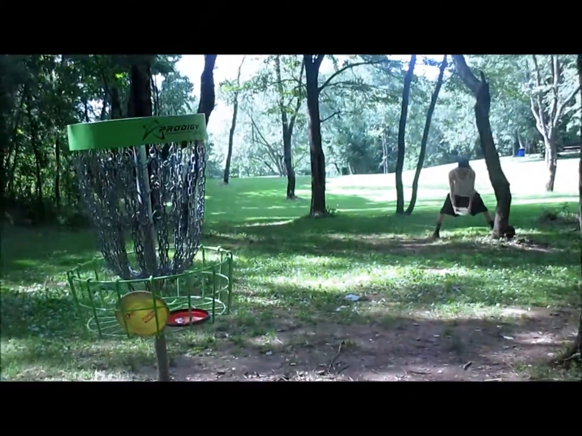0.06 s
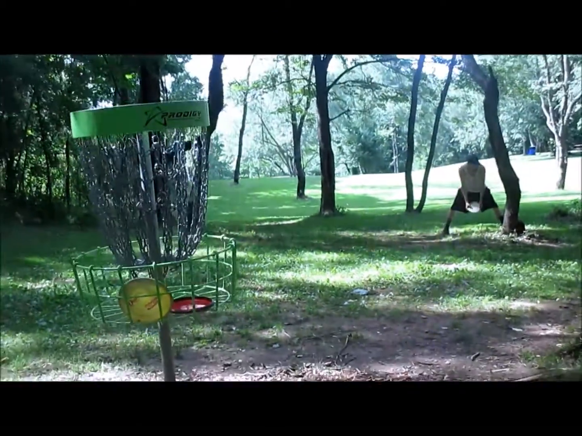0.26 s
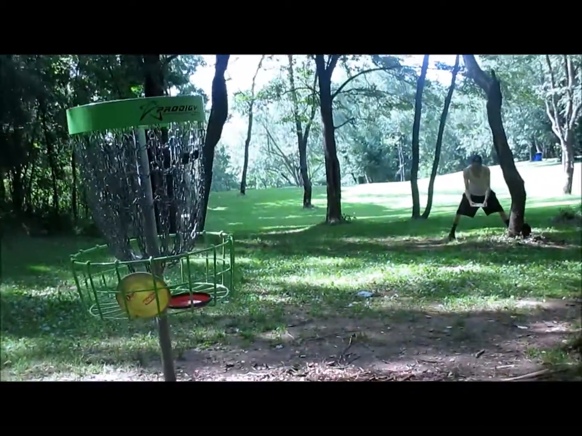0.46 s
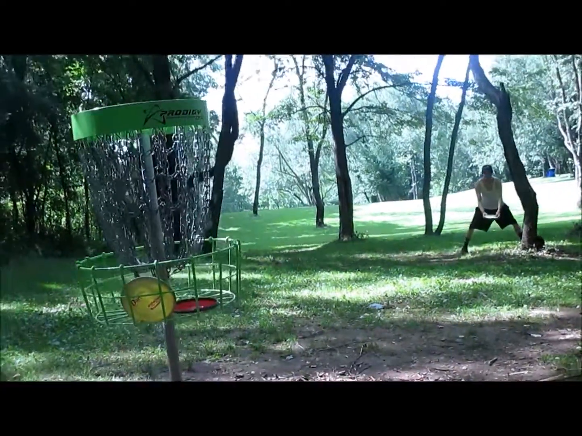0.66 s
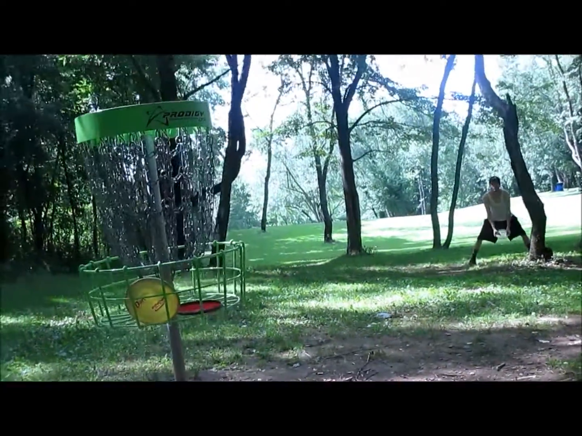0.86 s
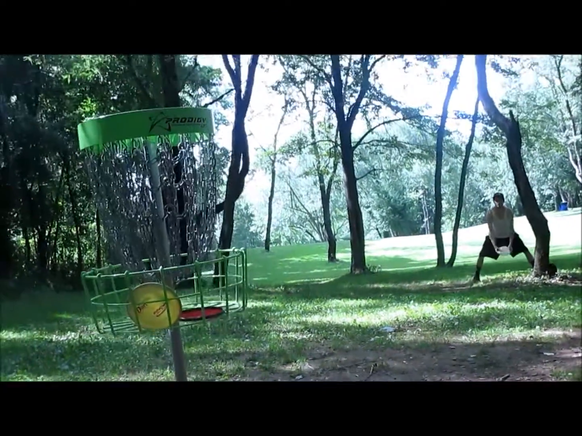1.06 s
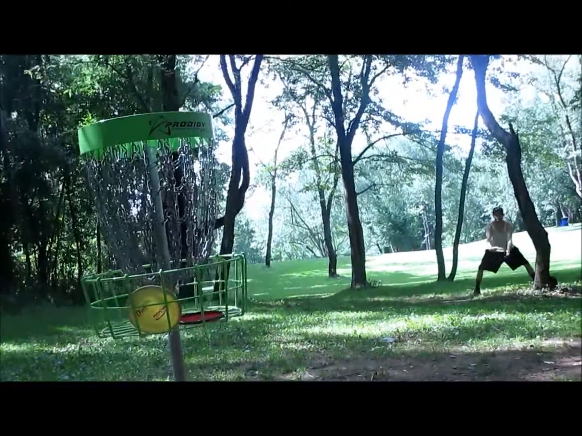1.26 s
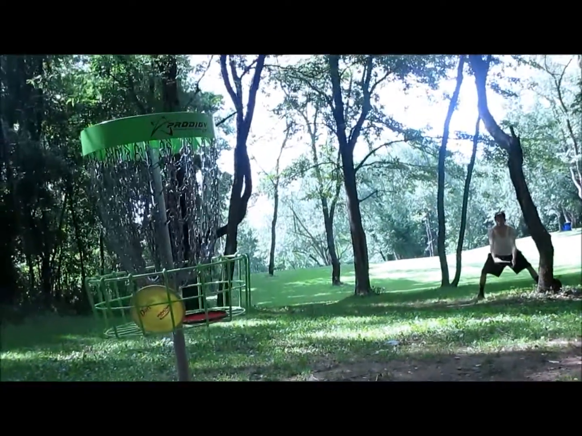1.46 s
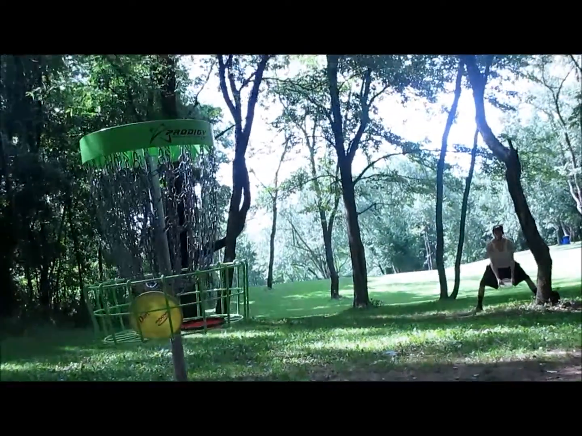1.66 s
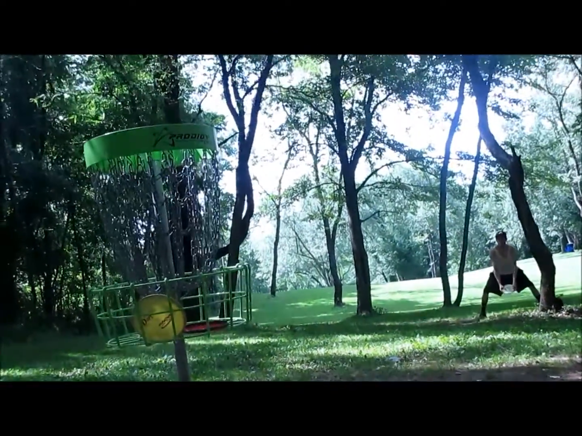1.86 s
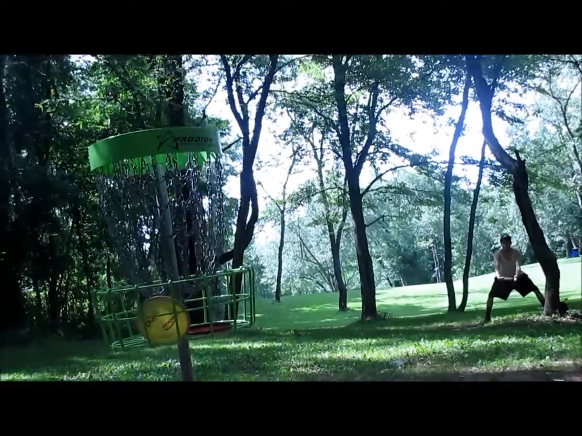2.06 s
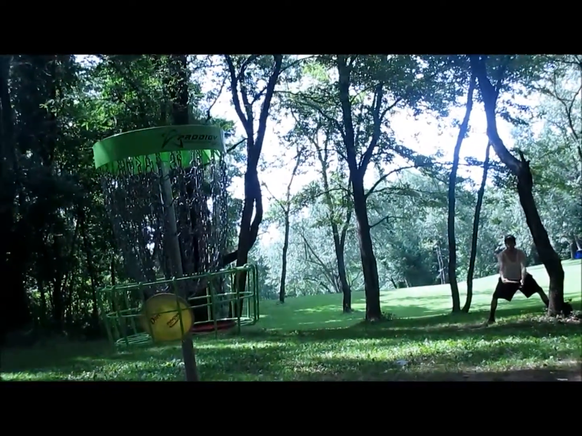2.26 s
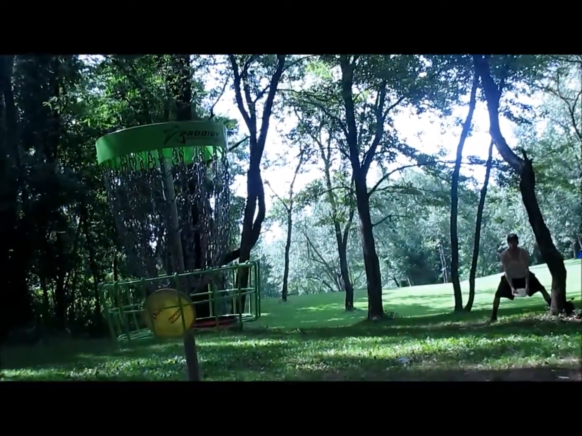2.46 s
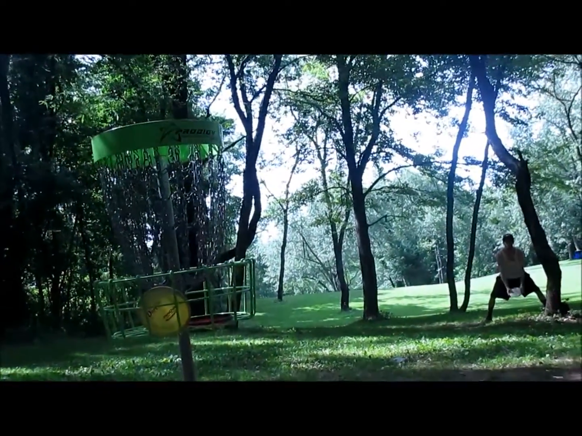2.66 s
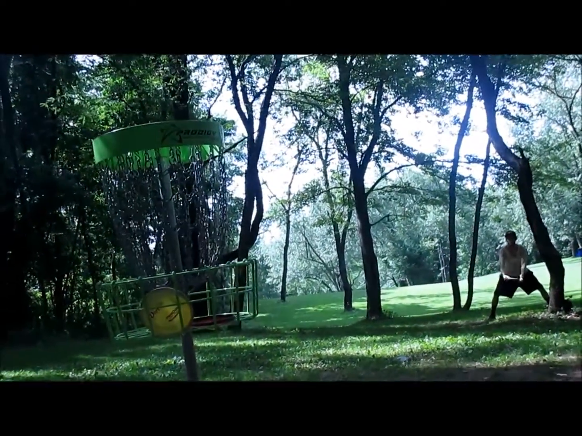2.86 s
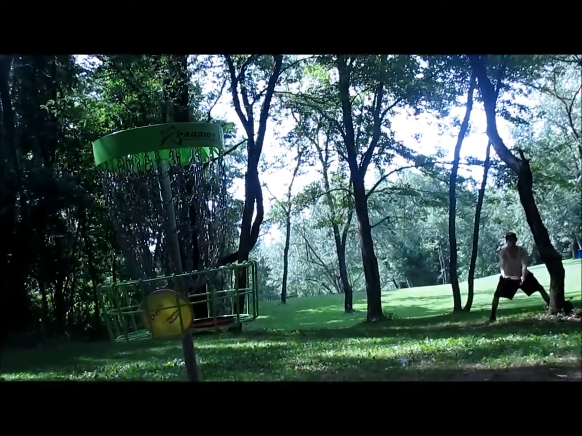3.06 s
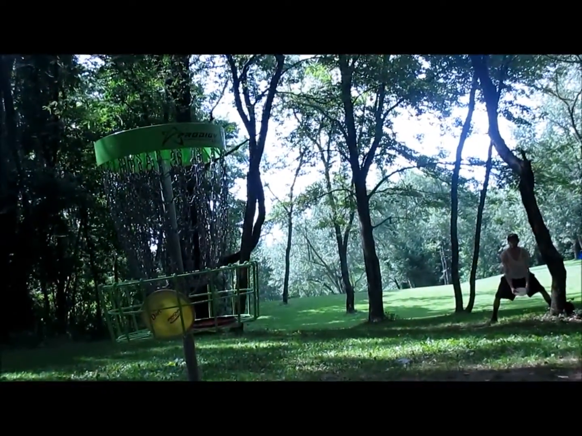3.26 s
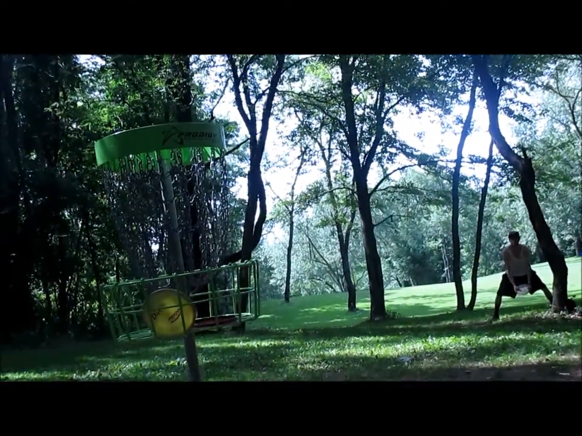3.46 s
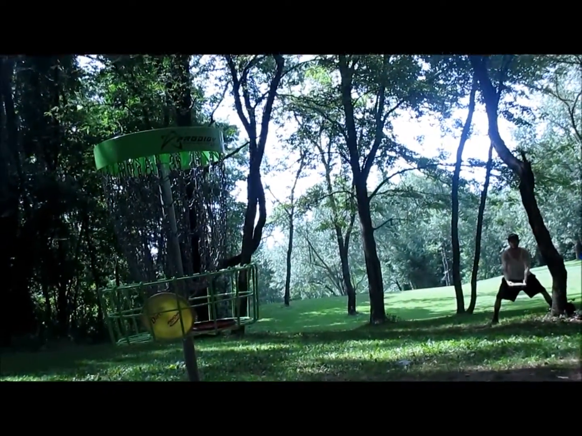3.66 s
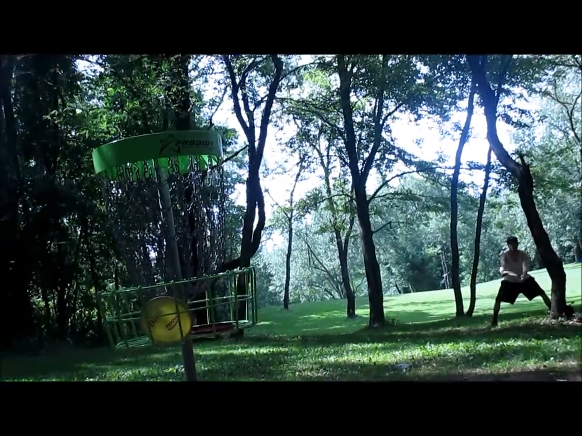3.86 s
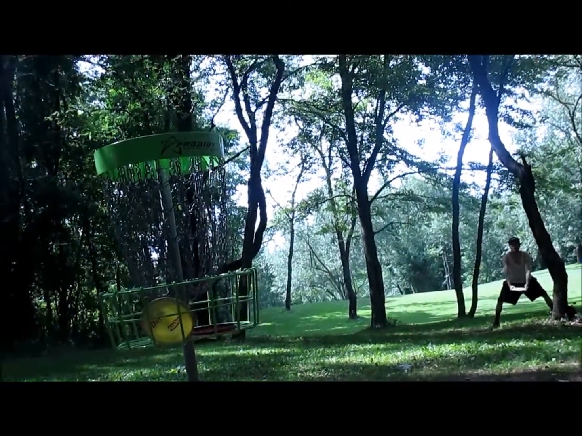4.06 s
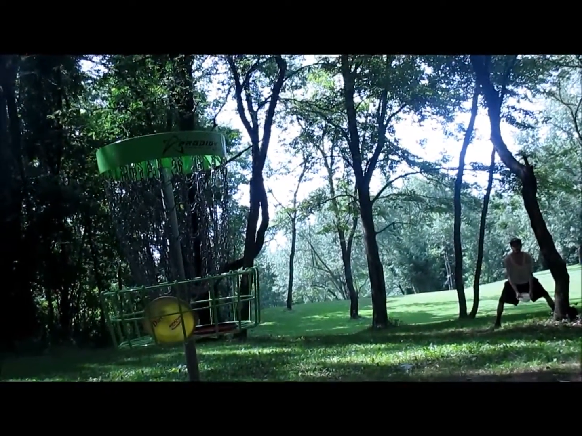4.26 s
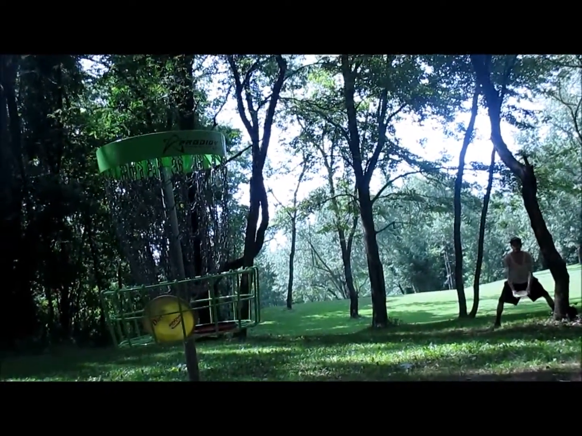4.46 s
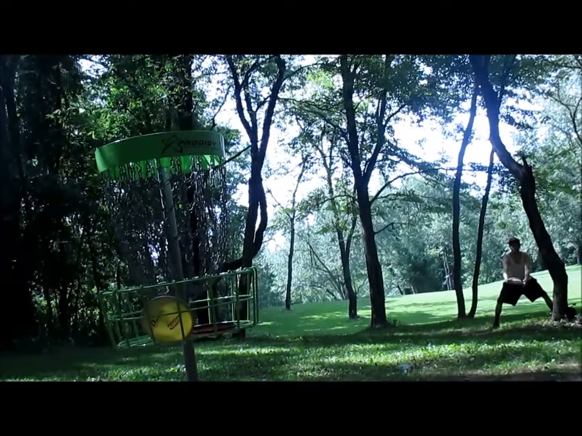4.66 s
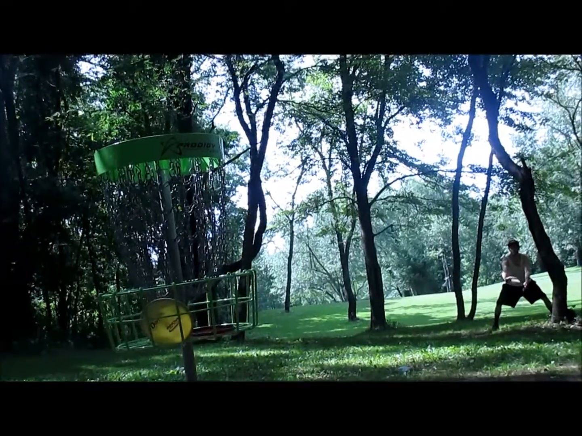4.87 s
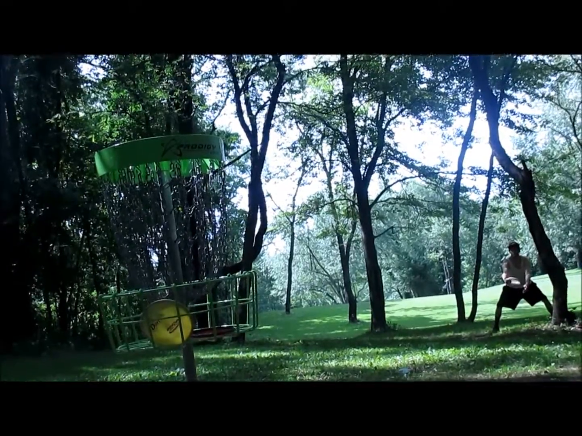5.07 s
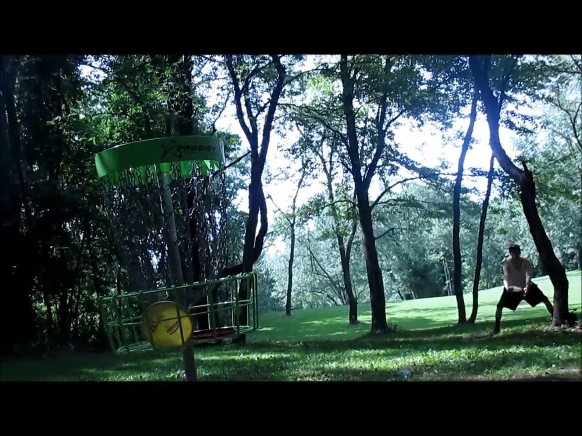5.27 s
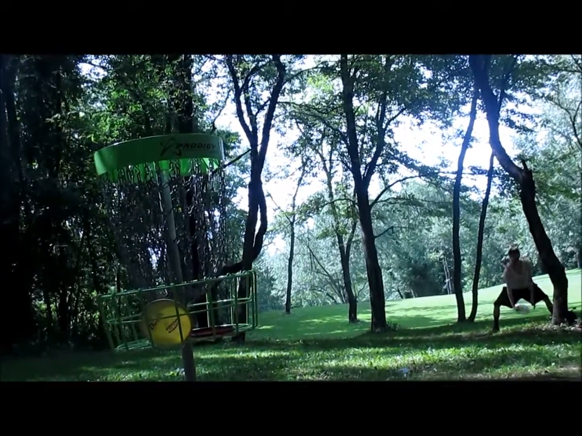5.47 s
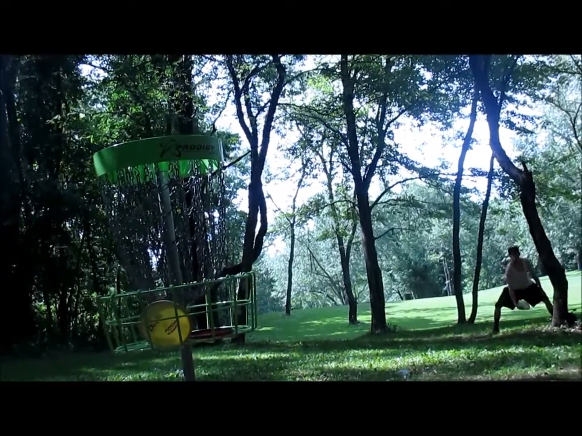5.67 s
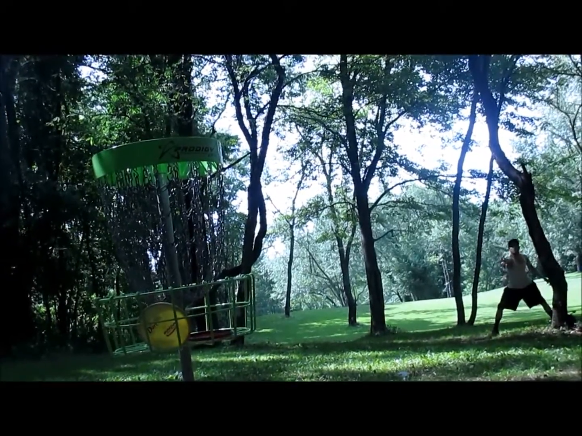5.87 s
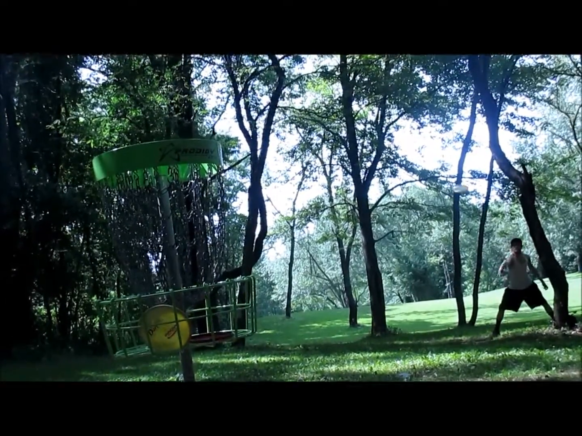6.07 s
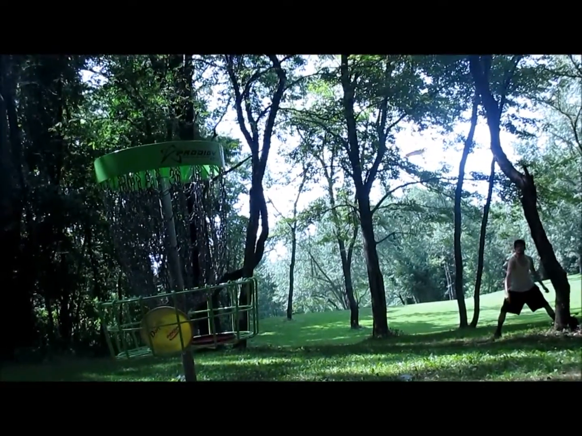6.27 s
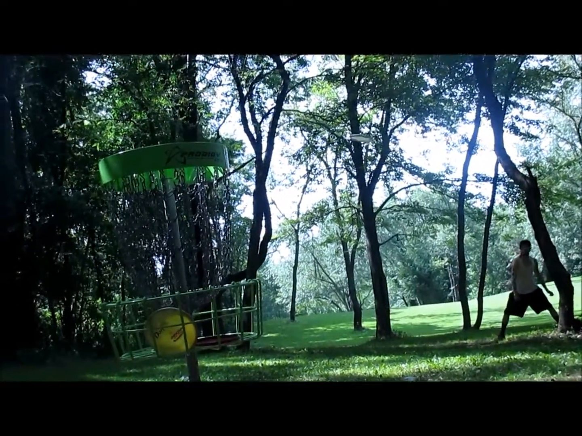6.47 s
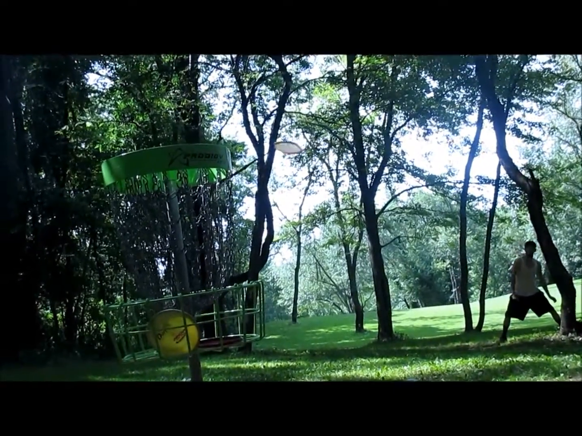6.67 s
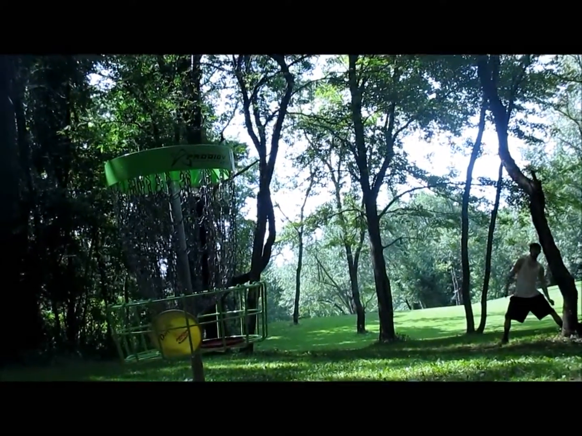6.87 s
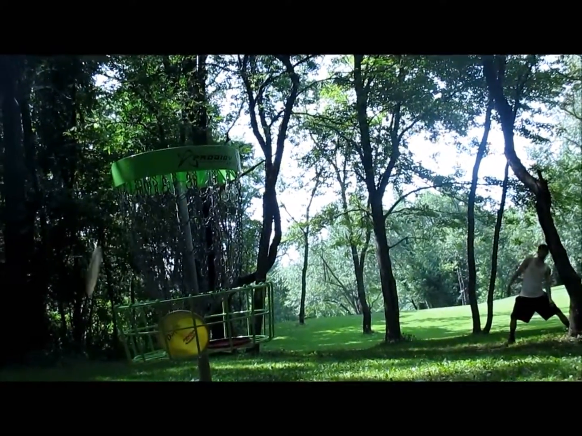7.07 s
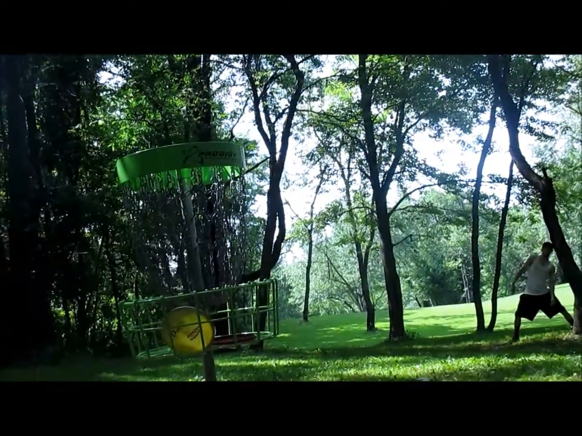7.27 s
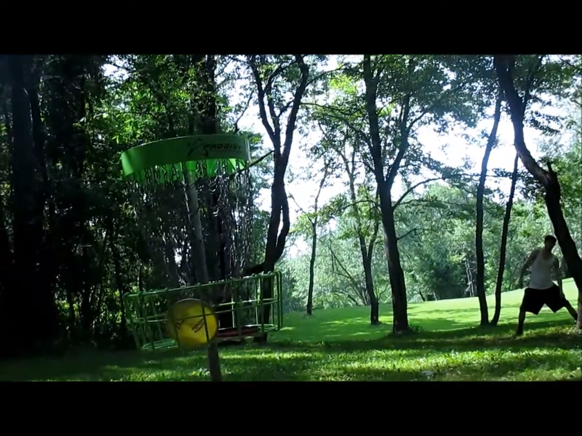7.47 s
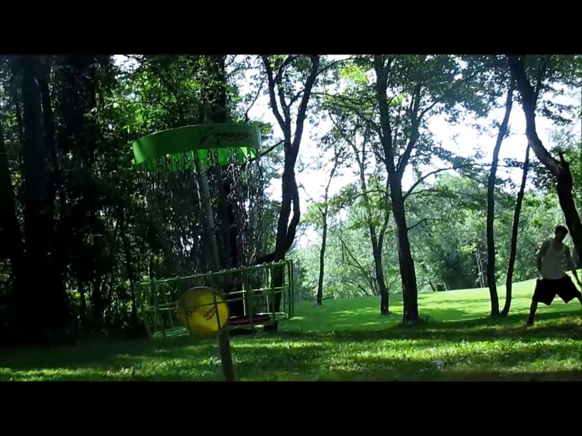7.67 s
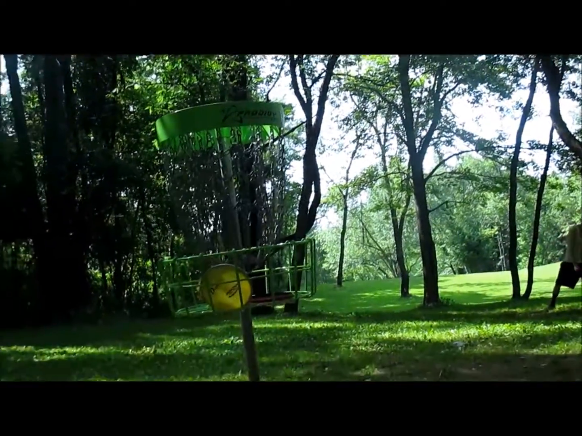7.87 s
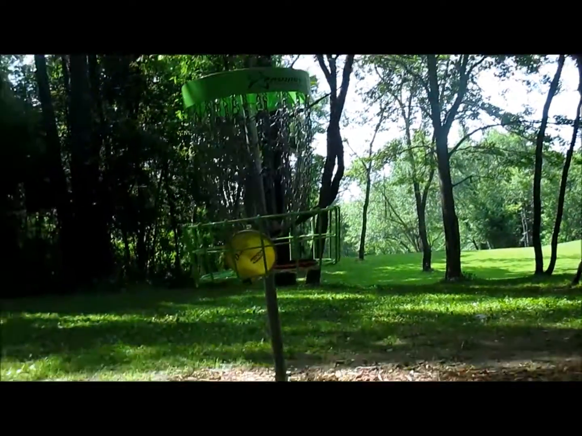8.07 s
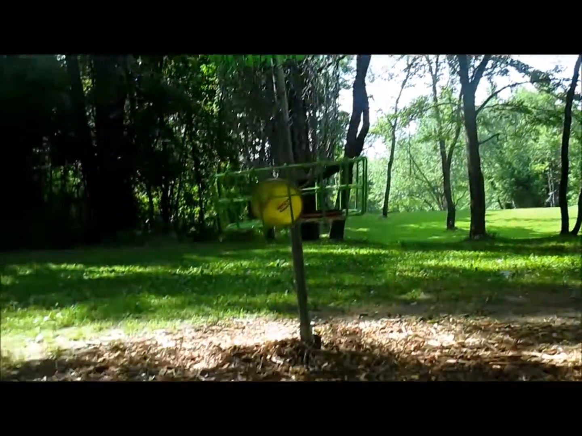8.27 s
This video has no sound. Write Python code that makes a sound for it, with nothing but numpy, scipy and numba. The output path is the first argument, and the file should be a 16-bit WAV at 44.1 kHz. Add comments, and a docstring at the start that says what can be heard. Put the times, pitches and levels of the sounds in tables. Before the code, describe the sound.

Quiet park air with faint birdsong and tiny ticks; after seven seconds a sudden loud chain clash, a few duller knocks, and fading metallic jingling.

```python
"""In a wooded park, a plastic disc slams into the hanging chains of a metal basket and drops into the tray.
Disc, links and frame are sums of fading sine tones; the links clink on over a dense rattle of tiny hits.
Behind them, shaped noise makes distant traffic rumble and leaf hiss, with a faint hum and whine.
Birds are gliding sine whistles with echoes among the trunks, and small ticks are short bursts of tones.
Early on the background drops out around a click and comes back muffled, then clears."""
import sys
import numpy as np
from scipy import signal
from scipy.fft import rfft, irfft
from scipy.io import wavfile
from scipy.ndimage import uniform_filter1d, map_coordinates
from numba import njit

SR = 44100
rng = np.random.default_rng(int(sys.argv[2]) if len(sys.argv) > 2 else 0)


def pcm_store(signal):
    """Save signal as 16-bit PCM."""
    levels = np.round(np.clip(np.atleast_2d(signal), -1, 1) * 32767)
    wavfile.write(sys.argv[1], SR, levels.astype(np.int16).T)


N = 366912

# Tone colour of the park noise. Each row: pitch in Hz, relative level in dB per Hz.
PARK_COLOUR = [(13, -30), (22, -3.5), (55, 1.5), (85, 0.5), (189, -8.5), (328, -17), (585, -18),
               (961, -20.5), (1670, -31), (2590, -31.5), (5030, -41), (8720, -50.5), (11200, -60),
               (12100, -60), (16000, -66)]
PARK_DB = -37.5  # level of the park noise before the slow changes below
HUM_HZ, HUM_DB, WHINE_HZ, WHINE_DB = 957, -63, 11800, -87
# Slow swell of the background. Each row: time in seconds, level change in dB.
SWELL = [(0, -3.5), (1, -2), (2.5, -1.5), (3.5, 0.5), (5, .5), (8.32, 0)]
# The pitches, in Hz, at which the four background changes below are given.
CHANGE_HZ = [80, 600, 1800, 7000]
# Passing changes of background colour, each in dB at those four pitches.
OPENING_DB, OPENING_FADE_S = [-3, 0.5, 14, 8.5], 0.06  # a brighter hiss that fades at once
# Change before the dropout: level in dB at each of the four pitches.
EARLY_DB = [0, 1.5, -2, -5]
MUFFLED_DB, CLEARS_S = [-1, -12.5, -29, -8.5], (0.6, 0.95)  # from the dropout; clears between these times
CRASH_DB, CRASH_FADE_S = [-7, -9.5, 11.5, 17], 0.7  # the bass dips, the treble rises, and both return
DROPOUT_S, DROPOUT_DB = (0.3773, 0.436), -22

# Small ticks near the microphone. Each row: start in seconds, relative level in dB, centre pitch in Hz.
TICKS = [(.021, -45, 2500), (.04, -36.5, 1000), (.127, -41, 1070), (.396, -53, 4000), (0.399, -48, 4760),
         (0.628, -44.5, 288), (.639, -60, 5000), (1.607, -43, 1000), (1.767, -35, 2090), (1.77, -40, 2600),
         (1.778, -47, 1600), (2.029, -39.5, 1500), (4.235, -61, 8000)]

# Near warbling bird; each note glides to a turning pitch and on.
# Each row: start in seconds, seconds to the turn, seconds after the turn, start pitch in Hz,
# turning pitch in Hz, end pitch in Hz, level at the turn in dB before wavering.
WARBLES = [(.584, .034, .082, 4867, 3320, 2550, -75), (0.788, 0.021, 0.014, 2700, 2683, 2700, -60),
           (1.32, .014, .016, 2650, 2600, 2490, -58.5), (1.483, 0.019, 0.023, 2598, 2880, 2690, -54.5),
           (1.552, 0.025, 0.027, 2740, 3340, 3400, -49), (1.635, 0.017, .019, 4630, 3580, 3300, -51.5),
           (1.835, .018, 0.032, 2510, 2985, 3500, -61), (1.883, 0.038, .105, 3480, 2770, 2610, -57),
           (2.311, .02, 0.027, 2990, 2460, 2480, -57), (2.442, 0.017, 0.007, 3230, 3400, 3800, -47),
           (2.466, 0.013, 0.021, 3190, 2800, 2500, -51), (2.507, .01, .028, 3090, 2900, 2410, -50),
           (2.543, 0.028, .03, 2350, 2550, 2860, -53), (2.558, .01, .018, 3250, 3600, 4750, -48),
           (2.602, 0.028, 0.036, 2880, 2964, 2990, -53), (3.298, .014, .033, 4600, 3290, 2580, -50.5),
           (3.36, 0.032, 0.038, 3100, 3292, 4500, -47.5), (3.424, .02, 0.024, 3600, 3080, 2620, -49.5),
           (4.003, .019, .012, 5420, 5200, 3964, -58), (4.034, 0.031, 0.049, 3964, 3670, 2500, -49.5),
           (4.25, .026, 0.021, 2460, 3406, 3320, -46.5), (4.315, .02, .045, 2570, 2725, 2810, -54),
           (5.02, .016, 0.033, 3460, 3410, 2770, -51.5), (5.08, 0.034, .008, 2930, 3930, 3910, -47.5),
           (5.125, 0.024, .015, 3360, 3240, 3096, -49.5), (5.168, .012, 0.025, 2680, 2950, 2770, -48.5),
           (5.798, 0.016, .047, 3470, 3320, 2740, -49), (5.864, .022, .026, 2725, 3050, 4950, -48.5),
           (6.604, 0.027, .053, 3360, 4600, 5450, -56), (6.7, 0.013, 0.031, 5270, 4470, 4260, -51.5),
           (6.855, .008, 0.033, 3350, 3330, 3480, -46.5), (6.921, .008, 0.029, 4040, 3820, 3820, -48),
           (7.72, 0.014, .024, 3320, 3540, 3340, -48), (7.972, 0.022, .02, 3000, 3140, 2771, -55),
           (8.023, 0.022, .031, 2400, 2450, 2490, -51), (8.14, 0.04, 0.028, 2410, 2695, 2350, -50.5),
           (8.211, 0.024, .01, 2370, 2440, 2460, -53)]
WARBLE_START_DB, WARBLE_END_DB = -5.5, -8  # against the turn
# Farther birds. Each row: start in seconds, length in seconds, start pitch in Hz, end pitch in Hz,
# level in dB before wavering.
WHISTLES = [(.0, .24, 3450, 3290, -67), (.02, 0.13, 3140, 3110, -66), (.1, .25, 2920, 2970, -77),
            (0.057, 0.19, 2240, 2290, -64), (0.207, .17, 2600, 2625, -64), (0.497, .12, 2300, 2600, -88),
            (0.827, 0.026, 2810, 3470, -57), (0.857, 0.054, 3300, 2780, -65),
            (1.352, 0.16, 1960, 2000, -70), (1.487, 0.086, 5100, 5100, -70), (2.26, 0.072, 4500, 4500, -66),
            (2.31, 0.031, 4900, 5740, -60), (2.356, 0.057, 1940, 1990, -65), (2.672, .15, 4900, 4900, -72),
            (3.001, 0.074, 2096, 2150, -68), (3.08, 0.089, 3170, 3110, -67),
            (3.121, 0.029, 2620, 2480, -58.5), (3.16, .08, 2520, 2520, -81),
            (3.273, 0.027, 3870, 4930, -61), (3.275, 0.022, 3500, 3400, -57), (4.12, .06, 4220, 3980, -61),
            (4.217, 0.12, 2250, 2280, -62), (4.602, 0.31, 2634, 2630, -59), (4.75, 0.31, 2290, 2160, -65),
            (5.169, 0.096, 2300, 2270, -58), (5.319, 0.24, 2265, 2357, -58.5),
            (5.252, 0.11, 3400, 3530, -58.5), (5.327, 0.29, 3260, 3190, -59), (5.42, 0.27, 3500, 3500, -67),
            (4.85, 0.13, 2920, 2840, -71), (4.45, .2, 4900, 5070, -78), (3.6, 0.1, 4830, 4770, -77),
            (1.612, 0.028, 4330, 4930, -59.5), (6.563, 0.032, 4300, 3430, -59),
            (5.51, 0.45, 2650, 2626, -60), (5.603, 0.18, 3070, 3070, -64), (5.922, 0.23, 2700, 2590, -64),
            (5.95, 0.18, 4260, 4200, -69), (6.023, 0.18, 3540, 3570, -68), (6.277, 0.19, 3000, 3015, -62.5),
            (6.33, 0.17, 2564, 2630, -61), (6.44, 0.12, 1970, 1980, -62.5), (6.48, 0.18, 2700, 2544, -58.5),
            (6.499, 0.22, 2960, 2946, -57), (6.807, 0.054, 2930, 2570, -56), (6.95, 0.04, 2470, 2550, -52)]

# Disc knocks. Each row: start in seconds, relative level of the disc's body in dB,
# low thump in dB compared with the body, before each gets its own trim.
KNOCKS = [(7.016, -1.5, -35), (7.025, -4.5, -26), (7.033, -5, -25), (7.043, -6, -27), (7.048, -10, -14),
          (7.058, -4.5, -36), (7.077, -6.5, -38), (7.219, -34, -12), (7.427, -13.5, 2.5), (7.45, -15, 5.5),
          (7.483, -32, -16), (7.635, -24.5, -7)]
# Ringing tones of the disc. Each row: pitch in Hz, relative level in dB, time to fade by 60 dB in seconds.
DISC_TONES = [(695, -0.5, 0.021), (900, -11, 0.026), (1055, -4.5, 0.023), (1189, 1, 0.032),
              (1289, 1, 0.034), (1684, -1.5, 0.033), (2120, -7, 0.02), (3260, -2, 0.018)]
# Low thump tones of a knock. Each row: pitch in Hz, relative level in dB, time to fade by 60 dB in seconds.
THUMP_TONES = [(146, -12, 0.038), (192, -2, 0.032), (278, -1.5, 0.043), (485, -1.5, 0.021)]
THUMP_SCATTER_DB, SINGING_SCATTER_DB = 1.5, 4  # chance spread of the tone levels

# Link collisions. Each row: start in seconds, then relative levels in dB of the crack, the link ring,
# the link overtones and the frame, then the pitch in Hz favoured in the frame.
CLINKS = [(7.014, -12.5, -35, -40, -4, 1660), (7.027, -10.5, -27, -37, -32, 1670),
          (7.0499, -15.5, -11, -35, -28, 3120), (7.06, -32, -12.5, -28, -28, 4220),
          (7.074, -23, -23, -24, -20, 4230), (7.0792, -14, -8, -34, -25, 4320),
          (7.0867, -21.5, -4.5, -21, -28, 4170), (7.1753, -31, -25, -40, -48, 3130),
          (7.204, -20, -28, -29, -46, 4250), (7.2396, -27, -18.5, -33, -32, 3430),
          (7.2552, -29, -22.5, -37, -20, 2970), (7.2976, -32, -39, -41, -27, 4250),
          (7.311, -27, -28, -39, -25, 4300), (7.3342, -26, -40, -32, -22, 4240),
          (7.3734, -26.5, -37, -25.5, -38, 3400), (7.4102, -26, -39, -29, -41, 4260),
          (7.423, -23.5, -35, -47, -29, 2910), (7.449, -23, -26, -50, -22, 1870),
          (7.481, -22.5, -24.5, -47, -26, 4260), (7.5073, -29.5, -25.5, -33.5, -30, 1670),
          (7.5462, -32, -45, -44, -37, 3170), (7.5682, -25.5, -28.5, -47, -19.5, 1920),
          (7.6254, -37, -36, -50, -24.5, 1990), (7.662, -46, -44, -55, -30, 1990),
          (7.7434, -41, -49, -43, -29, 2100), (7.7814, -40, -53, -41, -34, 2630),
          (7.827, -45, -53, -54, -43, 3720), (7.864, -45, -55, -63, -55, 3110),
          (7.937, -40.5, -42.5, -56, -44, 3050), (7.995, -44, -53, -58, -45, 2950),
          (8.0443, -40, -57, -50, -42, 2500), (8.094, -37.5, -50, -56, -46, 1980),
          (8.169, -43.5, -50, -44, -51.5, 2640), (8.2449, -43, -52, -57, -55, 2360),
          (8.2794, -55, -56, -48, -58, 2380)]
# Main ring of a link. Each row: pitch in Hz, relative level in dB, time to fade by 60 dB in seconds.
LINK_TONES = [(4592, -9, .7), (4650, 0, .22), (4696, -1, .18)]
# High overtones of a link. Each row: pitch in Hz, relative level in dB, time to fade by 60 dB in seconds.
OVERTONES = [(13000, -21, 0.27), (12930, -11, .2), (13240, -12, 0.21), (13600, -2.5, 0.16),
             (13730, 3.5, 0.3), (14100, -1, 0.19), (13950, -13, 0.16), (14980, -17, .1), (15150, -19, .1)]
# Tones of the metal frame. Each row: pitch in Hz, relative level in dB, time to fade by 60 dB in seconds.
FRAME_TONES = [(1670, -3.5, 0.2), (1910, -5, 0.23), (1972, -7, 0.21), (2056, -6.5, 0.3), (2210, -18, .15),
               (2510, -6, 0.21), (2720, -5, 0.18), (2910, 1, 0.19), (3140, -2, 0.22), (3320, -5, .15),
               (3660, -3, 0.14), (4260, -7, .15), (4240, 3, 0.16), (4860, -4, 0.22), (5080, -10, .15),
               (5540, -16, .15)]
# Tone colour of cracks and rattle. Each row: pitch in Hz, relative level in dB.
RATTLE_COLOUR = [(120, -51), (200, -13.5), (1480, -15.5), (3020, -8.5), (3900, -9), (4680, -8.5),
                 (6880, -14), (11700, -21), (13600, -47), (16000, -35)]
RATTLE_DB, RATTLE_FALL_DB_S = -14, 253  # rattle after each collision, against its crack; fall in dB per second
SWING_DB, SWING_FALL_DB_S = -36.5, 29  # rattle of the swinging chains between collisions
LIGHT_DB, LIGHT_TILT = -37, 0.27  # cracks below this level lose bass: dB per octave for each dB lighter

TOP_HZ = 15900  # highest pitch the microphone input passes


def undb(db):
    """Turn decibels into a plain multiplier."""
    return 10 ** (np.asarray(db) / 20)


def level(x, db):
    """Scale a sound to an average (RMS) level in dB."""
    return x * undb(db) / np.sqrt(np.mean(x ** 2))


def curve(s, values):
    """Join values at the given seconds with straight lines, over the whole scene."""
    return np.interp(np.arange(N) / SR, s, values)


def walk(rate):
    """Random values held for 1 / rate seconds and smoothed twice; their spread is near 1."""
    hold = int(SR / rate)
    steps = np.repeat(rng.standard_normal(N // hold + 1), hold)
    smooth = uniform_filter1d(uniform_filter1d(steps, hold), hold)
    return 1.296 * smooth[:N]


def colour(x, points):
    """Make some pitches louder than others, following (Hz, dB) points."""
    hz, db = np.transpose(points)
    f = np.maximum(np.arange(len(x) // 2 + 1) * SR / len(x), 1)
    gain = undb(np.interp(np.log(f), np.log(hz), db))
    return irfft(rfft(x) * gain, len(x))


def echo(x, wet_db, t60):
    """Trunks scatter the sound into a noisy tail that fades by 60 dB in t60 seconds."""
    t = np.arange(SR) / SR
    tail = rng.standard_normal(SR) * 1000 ** (-t / t60)
    tail = tail * (t > .008)  # the first echo comes after 8 ms
    tail = level(tail, wet_db) / np.sqrt(SR)
    return x + signal.fftconvolve(x, tail)[:N]


@njit
def partials(out, at, size, pole):
    """Add one fading sine for each start sample, size and pole, until it has fallen 50 dB."""
    for k in range(len(at)):
        z = size[k] + 0j
        for i in range(at[k], min(len(out), at[k] + int(-5.8 / np.log(abs(pole[k]))))):
            out[i] += z.imag
            z *= pole[k]  # one small turn and one small loss per sample
    return out


def strike(s, db, hz, t60):
    """Struck things ring as fading sines: start s, dB, Hz, 60 dB fade s; negative Hz starts in opposition."""
    s, db, hz, t60 = (np.ravel(v) for v in np.broadcast_arrays(s, db, hz, t60))
    pole = np.exp(2j * np.pi * hz / SR - np.log(1000) / (t60 * SR))
    return partials(np.zeros(N), (s * SR).astype(np.int64), undb(db), pole)


def background_db(octave):
    """Background level change over time at one pitch (log2 of Hz): slow swell plus the passing changes."""
    t = np.arange(N) / SR
    early, since_crash = t < DROPOUT_S[0], t - CLINKS[0][0]

    def at_pitch(db):
        """Read a four-pitch change at this pitch."""
        return np.interp(octave, np.log2(CHANGE_HZ), db)

    change = curve(*np.transpose(SWELL))
    change = change + at_pitch(OPENING_DB) * np.exp(-t / OPENING_FADE_S)
    change = change + at_pitch(EARLY_DB) * early
    change = change + at_pitch(MUFFLED_DB) * ~early * curve(CLEARS_S, [1, 0])
    crash_fade = (since_crash > 0) * np.exp(-np.abs(since_crash) / CRASH_FADE_S)
    return change + at_pitch(CRASH_DB) * crash_fade


def park():
    """Rumble and hiss: noise in half-octave bands that drift together and flicker alone, plus hum and whine."""
    noise = rfft(level(colour(rng.standard_normal(N), PARK_COLOUR), PARK_DB))
    octave = np.log2(np.maximum(np.arange(len(noise)) * SR / N, 16))
    out = 0
    for centre in np.arange(4, 14.6, .5):
        band = irfft(noise * np.clip(1 - 2 * np.abs(octave - centre), 0, 1), N)
        out = out + band * undb(background_db(centre) + 1.0 * walk(6))
    hum_level = undb(HUM_DB + 2.1 * walk(4.0)) * undb(background_db(np.log2(HUM_HZ)))
    hum = hum_level * np.sin(2 * np.pi * np.cumsum(HUM_HZ + 4 * walk(8)) / SR)
    t = np.arange(N) / SR
    whine = np.sqrt(2) * undb(WHINE_DB) * np.sin(2 * np.pi * WHINE_HZ * t)
    return out + hum + whine


def note(s, hz, db):
    """A near-sine whistle with soft ends; returns its first sample and its sound."""
    t = np.arange(int(s[0] * SR), int(s[-1] * SR)) / SR
    ends = np.clip(np.minimum(t - s[0], s[-1] - t) / 0.0016, 0, 1)  # 1.6 ms fades
    loudness = np.sqrt(2) * ends * undb(np.interp(t, s, db))
    phase = 2 * np.pi * np.cumsum(np.interp(t, s, hz)) / SR
    return int(s[0] * SR), loudness * np.sin(phase)


def birds():
    """Gliding whistles: the near warbler is clear with a halo of echoes, far ones waver through the leaves."""
    near, far = np.zeros(N), np.zeros(N)
    for s, to_turn, from_turn, *hz, db in WARBLES:
        times = [s, s + to_turn, s + to_turn + from_turn]
        at, sound = note(times, hz, [db + WARBLE_START_DB, db, db + WARBLE_END_DB])
        near[at:at + len(sound)] += sound
    for s, length, start_hz, end_hz, db in WHISTLES:
        at, sound = note([s, s + length], [start_hz, end_hz], [db, db])
        far[at:at + len(sound)] += sound
    # a path length that wanders by some samples smears the pitch
    far = map_coordinates(far, [np.arange(N) + 9 * walk(90)], order=3)
    far = far * undb(4.1 * walk(70) - 1.5)
    near = echo(near * undb(2.06 * walk(90)), wet_db=-1.0, t60=0.86)
    # far echoes from before the dropout stop where it starts
    before = np.arange(N) < DROPOUT_S[0] * SR
    far_before = before * echo(far, wet_db=-1, t60=0.92)
    far_after = echo(far * ~before, wet_db=2.5, t60=0.66)
    return near + far_before + far_after


def ticks():
    """Each tick is a few quickly fading tones around its centre; a lower centre gives less treble."""
    out = 0
    for s, db, hz in TICKS:
        tones = np.minimum(hz * np.array([.6, 1, 1.5, 2.2, 3.1]), 15000)
        tick = strike(s, db + np.array([-2.5, 6.5, 6, 4.5, -18.0]), tones, 5 / hz + 0.00088)
        treble_cut = signal.butter(2, min(2.5 * hz, 15000), fs=SR, output="sos")
        out = out + signal.sosfilt(treble_cut, tick)
    return out


def ring(tones, s, db, scatter_db, detune):
    """Each blow shares itself differently over the tones, slightly detuned; neighbours start in opposition."""
    hz, tone_db, t60 = np.transpose(tones)
    chance = rng.standard_normal((len(s), 2, len(tones)))
    opposition = (-1) ** np.arange(len(tones))
    hz = opposition * hz * (1 + detune * chance[:, 0])
    blow_db = np.reshape(db, (len(s), -1))
    return strike(s[:, None], blow_db + tone_db + scatter_db * chance[:, 1], hz, t60)


def jingle(s, db, t60, spread_s, count, thins):
    """Each collision sets off many short tones at chance pitches; with thins, light ones lose bass."""
    chance = rng.random((len(s), 3, count))
    hz = 400 + 15000 * chance[:, 0]
    colour_hz, colour_db = np.transpose(RATTLE_COLOUR)
    tone_db = np.interp(np.log(hz), np.log(colour_hz), colour_db)
    light = np.maximum(LIGHT_DB - db, 0)[:, None] * thins
    tone_db = tone_db + LIGHT_TILT * light * np.log2(hz / 7000)
    start = s[:, None] + spread_s * chance[:, 1] ** 2
    return strike(start, db[:, None] + tone_db, hz, t60 * (0.17 + 1.74 * chance[:, 2]))


def chains():
    """Link collisions crack, ring the links and shake the frame; a dense rattle follows and fills between."""
    s, crack_db, link_db, over_db, frame_db, frame_hz = np.transpose(CLINKS)
    hits = ring(LINK_TONES, s, link_db - 6, scatter_db=1.0, detune=0)
    hits += jingle(s, crack_db - 2.5, t60=0.026, spread_s=.005, count=60, thins=True)
    # several links take part in each collision
    hits += ring(OVERTONES, np.repeat(s, 3), np.repeat(over_db, 3) - 18.0, scatter_db=8, detune=.003)
    # where a link strikes the frame decides which tones speak
    octaves_apart = np.abs(np.log2(np.array(FRAME_TONES)[:, 0] / frame_hz[:, None]))
    shake_db = frame_db[:, None] - 9.5 - 45 * np.minimum(octaves_apart, .4)
    hits += ring(FRAME_TONES, s, shake_db, scatter_db=2.0, detune=0.0022)

    # 1500 small collisions at chance times, denser towards the start
    chance = rng.random((1500, 2)).T
    at = s[0] + (N / SR - s[0]) * chance[0] ** 1.5
    since = at[:, None] - s
    after = (since >= 0) * undb(crack_db + RATTLE_DB - RATTLE_FALL_DB_S * np.abs(since))
    swing = undb(SWING_DB - SWING_FALL_DB_S * (at - s[0]))
    small_db = 10 * np.log10(np.sum(after ** 2, axis=1) + swing ** 2)
    small_db = small_db - 2.6 * np.log(chance[1])  # a few are much louder than the rest
    rattle = jingle(at, small_db - 4.5, t60=0.054, spread_s=0.0015, count=12, thins=False)

    # every third small collision keeps the links singing; the main ring grows once the chains swing free
    sing_at, sing_db = at[::3], small_db[::3]
    free_db = np.interp(sing_at, [7.06, 7.15], [-20, 0])
    singing = ring(OVERTONES, sing_at, sing_db - 26.5, scatter_db=SINGING_SCATTER_DB, detune=.01)
    singing += ring(LINK_TONES, sing_at, sing_db + free_db - 14.5, scatter_db=6.5, detune=.001)
    return hits + rattle + singing


def disc():
    """Plastic knocks on pole, chains and tray: short body tones plus a low thump."""
    s, db, low_db = np.transpose(KNOCKS)
    body = ring(DISC_TONES, s, db - 8.5, scatter_db=3.0, detune=0.03)
    thump = ring(THUMP_TONES, s, db + low_db - 5.0, scatter_db=THUMP_SCATTER_DB, detune=.02)
    return body + thump


def scene():
    """Add everything up; the dropout dips only the park and the birds."""
    a, b = DROPOUT_S
    kept = undb(curve([a - .001, a, b, b + .001], [0, DROPOUT_DB, DROPOUT_DB, 0]))
    background = kept * (park() + birds())
    crash = echo(disc() + chains(), wet_db=-19.5, t60=0.54)
    return (background + ticks() + crash)[None]


def record(dry):
    """The microphone input rounds the loudest peaks and cuts the top."""
    rounded = np.tanh(0.77 * dry) / 0.83
    top_cut = signal.ellip(10, .2, 80, TOP_HZ, fs=SR, output="sos")
    return signal.sosfilt(top_cut, rounded)


dry = scene()
out = record(dry)
pcm_store(out)
```